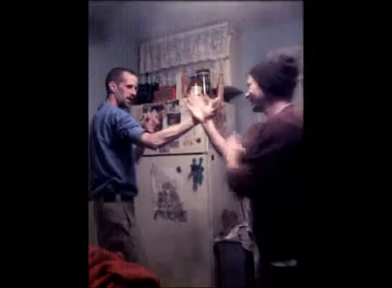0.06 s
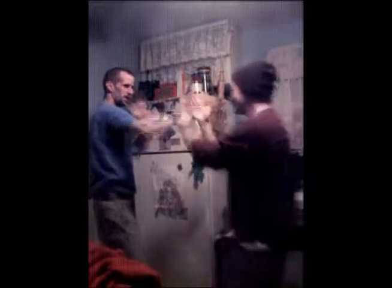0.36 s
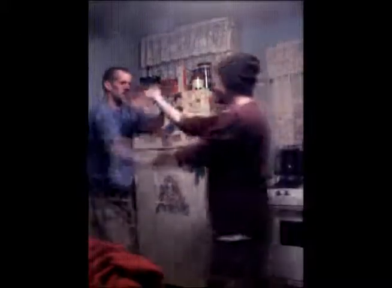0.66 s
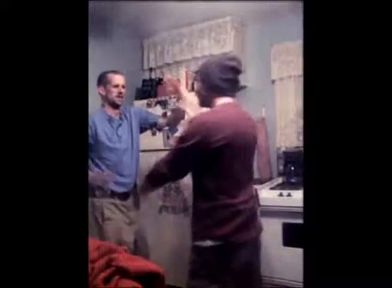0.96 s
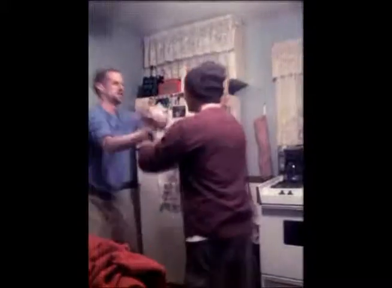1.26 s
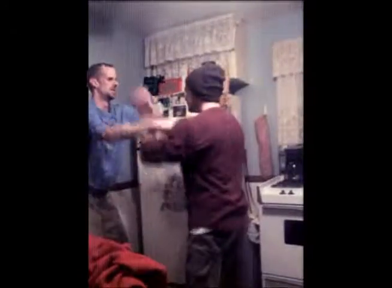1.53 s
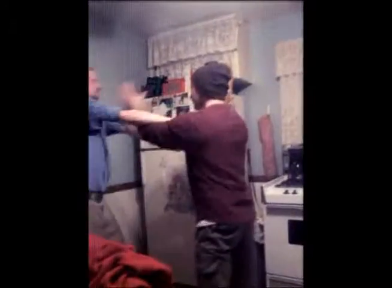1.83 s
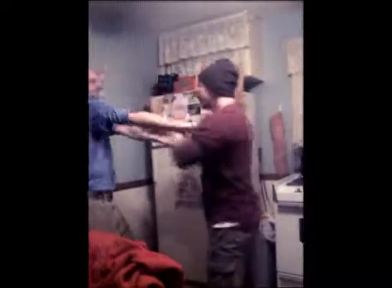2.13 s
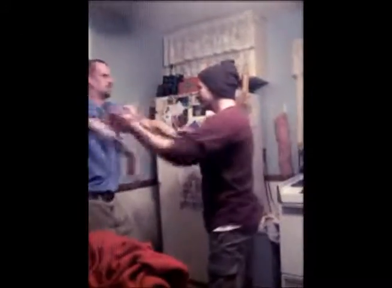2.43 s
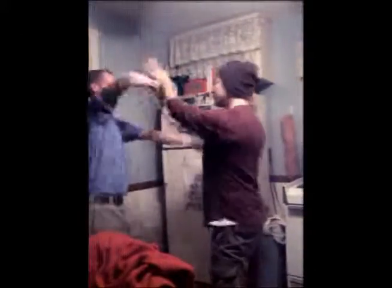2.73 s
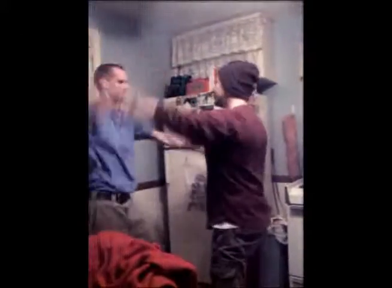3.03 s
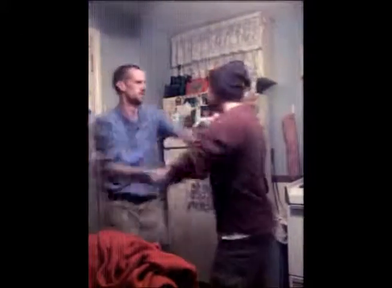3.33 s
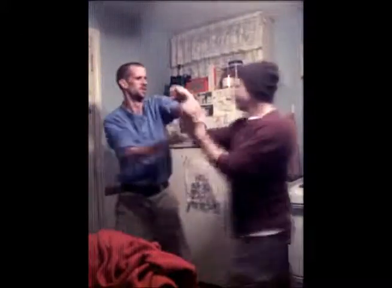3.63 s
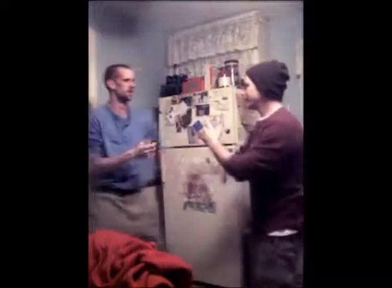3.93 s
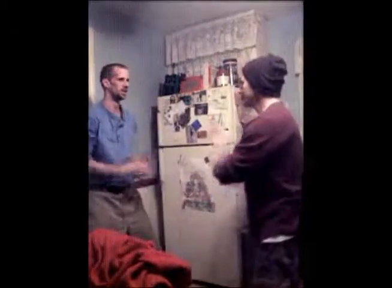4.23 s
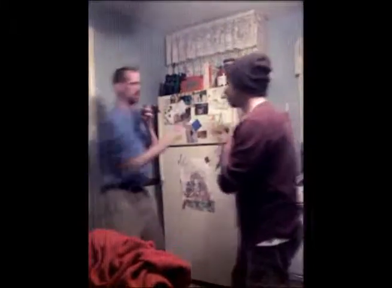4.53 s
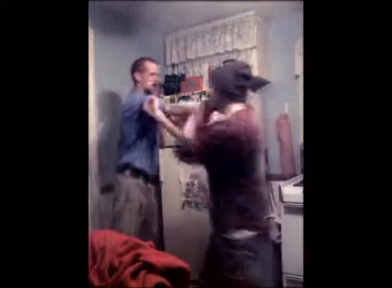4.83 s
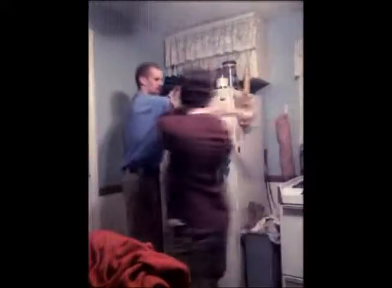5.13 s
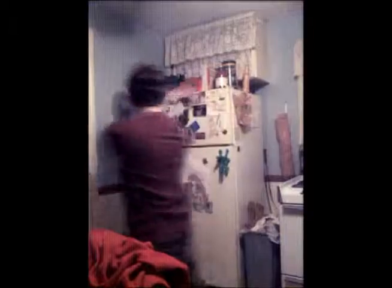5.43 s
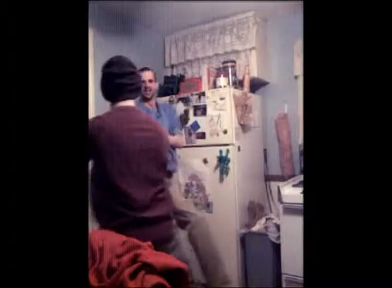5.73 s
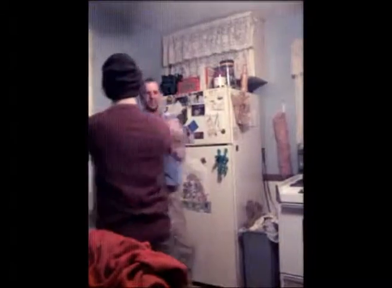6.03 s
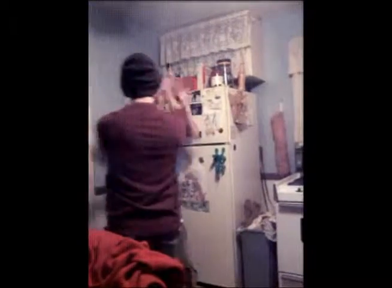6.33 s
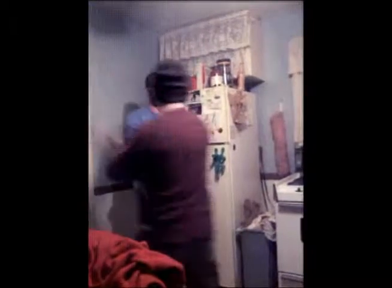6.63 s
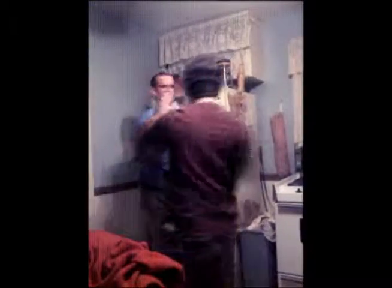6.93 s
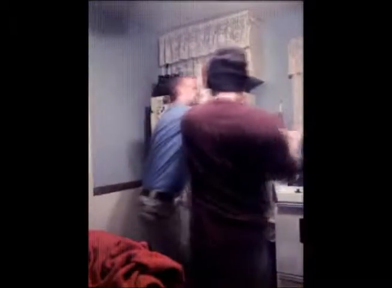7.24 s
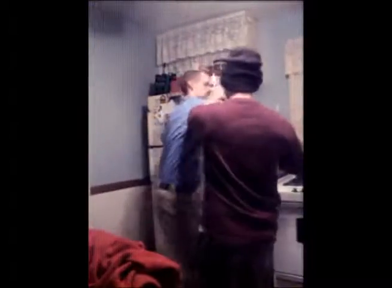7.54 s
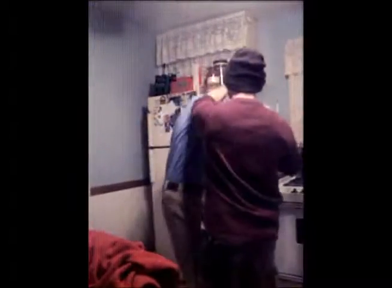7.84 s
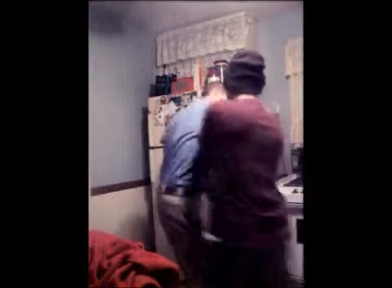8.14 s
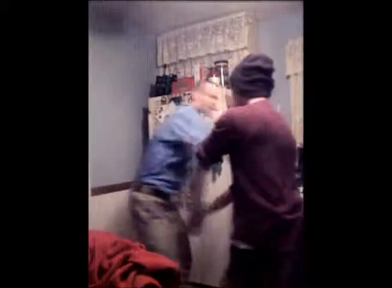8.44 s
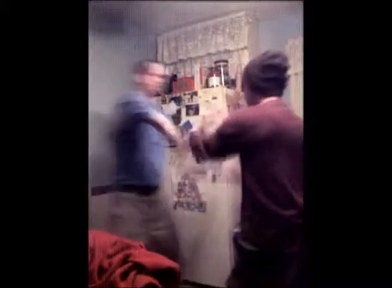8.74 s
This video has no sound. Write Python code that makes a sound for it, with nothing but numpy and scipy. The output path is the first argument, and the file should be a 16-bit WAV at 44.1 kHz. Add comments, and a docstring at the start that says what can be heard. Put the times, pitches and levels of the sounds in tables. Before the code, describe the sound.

Irregular swishes of cloth and sharp slaps on skin from two people sparring, over soft thumps on a wooden floor and a refrigerator hum.

```python
"""Sleeves swish and drag over each other as two people spar hand to hand in a small kitchen: a hiss of
slipping fibres, ticking where threads catch. Hands crack on forearms, a few with the pop of a cupped
palm, and these hits ring briefly in the room. Feet thump on a wooden floor that booms and rumbles
under the shifting weight. A refrigerator hums behind it all, and one small microphone hears the scene."""
import sys
import numpy as np
from scipy import signal
from scipy.fft import rfft, irfft, next_fast_len
from scipy.io import wavfile
from scipy.ndimage import uniform_filter1d, map_coordinates

SR = 44100
rng = np.random.default_rng(int(sys.argv[2]) if len(sys.argv) > 2 else 0)


def bounce(signal):
    """Save signal as a 16-bit WAV file at the path given by the first command-line argument."""
    frames = np.transpose(np.atleast_2d(signal))
    limited = np.clip(frames, -1, 1)
    pcm = np.round(limited * 32767).astype(np.int16)
    wavfile.write(sys.argv[1], SR, pcm)


N = 395577


def sleeves():
    """Sleeve slides over sleeve: speed brightens the hiss, firm pressure brings out the cloth's body."""
    # strokes: (start [s], rise [s], hold [s], hiss [dB], body re hiss [dB], brightness [dB])
    swishes = [(0, 0.0034, 0.0023, -32.5, -1.5, -2.5), (.062, .044, .004, -26.5, -8, 0),
               (0.188, 0.0079, 0.018, -32, -6, -3), (0.409, .015, .015, -27, -8.5, -2.5),
               (.548, .032, .014, -19.3, -6, -.3), (0.725, .055, .013, -32, -7.5, 3),
               (.865, 0.081, 0.053, -23.5, -12, -0.8), (1.109, 0.053, 0.018, -19, -11.5, 3),
               (1.199, 0.034, .036, -18.5, -14.5, -0.7), (1.384, 0.12, 0.062, -20, -8.5, -1.5),
               (1.575, .027, .017, -27, -6.5, 1.5), (1.964, 0.092, 0.098, -33, -18, 1),
               (2.2, .04, .05, -34.5, -2.5, 0), (2.616, .054, .027, -33.5, -5, 0.5),
               (3.123, .006, .002, -36, -19, 4), (3.195, .072, .078, -34.5, -6, -1),
               (3.341, 0.067, 0.12, -17.5, -12.5, 0.5), (3.572, 0.027, 0.19, -30.5, -10, -1),
               (3.87, 0.029, 0.074, -19, -6.5, 0), (4.287, .018, .045, -31, -12.5, -1.5),
               (4.528, 0.067, 0.064, -19.5, -10.5, 1.5), (4.687, .012, 0.032, -27, 0, 0),
               (4.761, .13, .002, -17, -10, 0.6), (5.035, .035, 0.025, -29.5, -11, -.5),
               (5.17, .012, .03, -30, 2, -1), (5.256, .044, .008, -15.5, -12, -1),
               (5.313, 0.045, 0.032, -19, -8.5, -.7), (5.418, .06, 0.088, -33.5, -5, -2),
               (5.738, .008, .016, -37.5, -4, -4), (5.914, .014, .006, -34, 0, 0.5),
               (6.085, .021, .003, -38.5, -9, 6), (6.218, 0.23, 0.063, -25, -14.5, -2.5),
               (6.672, 0.095, .039, -17.5, -8.5, -0.5), (6.857, .028, 0.033, -17.5, -13, 0),
               (6.92, .032, .008, -15.5, -19.5, -2.5), (6.998, .016, 0.17, -32, -5, -2.5),
               (7.346, .004, 0.0033, -20, -21, -.5), (7.4, .023, .031, -30.5, -5, -1),
               (7.505, .034, .063, -32, -9.5, -2.5), (7.804, 0.061, .089, -27.5, -8, -2.5),
               (7.952, 0.059, .002, -18, -9.5, -0.8), (8.094, .036, .008, -17.5, -17, 3),
               (8.16, 0.031, 0.084, -21.5, -12, .5), (8.395, .053, .088, -34, -7.5, -2),
               (8.631, .036, .058, -39, -2, -.8)]
    # clothes stirring between strokes: (time [s], hiss [dB])
    stirring = [(0, -48), (.3, -39), (1.35, -36.5), (1.72, -36), (1.9, -46), (2.4, -38.5), (2.95, -46.5),
                (3.65, -37), (3.86, -39.5), (4.15, -37.5), (4.5, -42.5), (5.6, -37), (6, -40.5),
                (7.25, -36.5), (7.75, -43), (8.4, -41), (8.97, -42)]
    # bright hiss of the weave: (frequency [Hz], level [dB])
    weave_spectrum = [(300, -38), (1200, -22), (2200, -8), (3200, -2), (4200, 0.8), (5200, 2), (6200, -2),
                      (7000, -8), (7800, -19)]
    # lower body of the cloth: (frequency [Hz], level [dB])
    body_spectrum = [(80, -13), (250, -2.5), (650, -1.5), (1200, 0.5), (2000, 2), (3200, -0.5), (5000, -7),
                     (7800, -49.5)]
    rustle = amp(np.interp(np.arange(N) / SR, *np.transpose(stirring)))
    coarse_power, fine_power = rustle ** 2, rustle ** 2
    body_power = (rustle * amp(-1.5)) ** 2
    for start, rise, hold, db, body_db, bright_db in swishes:
        power = (amp(db) * stroke(start, rise, hold)) ** 2
        coarse_power += power * amp(-bright_db) ** 2
        fine_power += power * amp(bright_db) ** 2
        body_power += power * amp(body_db) ** 2
    weave = friction(weave_spectrum, catches_per_s=1500, catch_share=0.13, flutter_db=0.52)
    weave = patchy(weave, depth_db=1.75)
    coarse = filtered(weave, lambda hz: 1 / (1 + (hz / 4200) ** 10))  # brightness tilts about 4200 Hz
    fine = weave - coarse
    body = friction(body_spectrum, catches_per_s=900, catch_share=0.18, flutter_db=1.4)
    grip = amp(0.4 * wobble(35))  # tightens and loosens within a stroke
    hiss = np.sqrt(coarse_power) * coarse + np.sqrt(fine_power) * fine
    return grip * (hiss + np.sqrt(body_power) * body)


def stroke(start, rise, hold, sag_db_per_s=17, release_db_per_s=190):
    """Envelope of one swish, 1 at mid-hold: the sleeve gathers speed, slows a little and comes to rest."""
    t = np.arange(N) / SR - start
    swell = np.clip(t / rise, 0, 1) ** 1.1
    sag_db = sag_db_per_s * (np.clip(t - rise, 0, hold) - hold / 2)
    release_db = release_db_per_s * np.clip(t - rise - hold, 0, 1)
    return swell * amp(-sag_db - release_db)


def friction(spectrum, catches_per_s, catch_share, flutter_db):
    """Countless fibres slip as a hiss; threads catch and snap free as tiny ticks."""
    sizes = rng.uniform(-1, 1, N)
    catches = (rng.random(N) < catches_per_s / SR) * sizes
    slips = np.sqrt(1 - catch_share) * rng.standard_normal(N)
    ticks = np.sqrt(catch_share) * unit(catches)
    folds = amp(flutter_db * wobble(90))  # passing folds change the pressure
    return unit(colour((slips + ticks) * folds, spectrum))


def patchy(hiss, depth_db):
    """The hiss shifts a little in colour from moment to moment."""
    bands = signal.stft(hiss, nperseg=512)[2]
    patches = uniform_filter1d(rng.standard_normal(bands.shape), size=5, axis=0)  # smooth over frequency
    patches = uniform_filter1d(patches, size=12, axis=1)  # and over time
    return signal.istft(bands * amp(depth_db * unit(patches)), nperseg=512)[1][:N]


def slaps():
    """A hand cracks on skin in one sharp pulse, thuds into the flesh and skids on over the sleeve."""
    # hands landing on arms: (time [s], crack [dB], thud re crack [dB], skid re crack [dB])
    hits = [(0.0653, -12, -12.5, -23), (0.185, -9.5, -22.5, -26.5), (0.4141, -5.5, -21, -15.5),
            (0.4202, 7.5, -42.5, -25), (0.5496, 6, -27.5, -32), (1.149, 0.5, -28, -37),
            (1.2298, 1.5, -36.5, -29), (3.134, -9.5, -49, -27), (3.8815, -9.5, -14.5, -29.5),
            (4.541, -1, -18.5, -17.5), (4.6252, 11, -39.5, -31), (4.707, 2.5, -29, -27),
            (5.1767, -8, -17.5, -23), (5.7362, -6.5, -26, -20.5), (6.6223, -9.5, -41, -22),
            (7.347, -1, -28.5, -20), (7.3595, 0, -32, -35), (8.1021, -0.5, -23.5, -28.5)]
    # bright smack of skin: (frequency [Hz], level [dB])
    skin_spectrum = [(200, -37), (800, -10), (2000, 5), (3500, 8), (5500, 7.5), (7000, 1), (7900, -33)]
    # dull thud of flesh: (frequency [Hz], level [dB])
    flesh_spectrum = [(100, -5), (300, -3), (650, 0), (1200, -0.5), (2200, -14), (6000, -39.5)]
    crack, thud, skid = np.zeros((3, N))
    for s, db, thud_db, skid_db in hits:
        pulse = amp([db])
        add(crack, s, pulse)
        add(crack, s + rng.uniform(0.0019, 0.0049), 0.54 * pulse)  # echo from the nearest surface
        add(thud, s, amp(db + thud_db) * burst(rise=0.00079, t60=0.17))
        add(skid, s, amp(db + skid_db) * burst(rise=0.00047, t60=0.16))
    return room(colour(crack + skid, skin_spectrum) + colour(thud, flesh_spectrum), wet_db=-10)


def palms():
    """Air squeezed from under a cupped palm pops, higher and shorter when the hollow is small."""
    # ringing hollows: (time [s], level [dB], pitch [Hz], t60 [s])
    hollows = [(.4204, 6.5, 2340, 0.0032), (.551, -11, 727, 0.049), (3.8795, -13, 619, .04),
               (4.542, -19, 783, .045), (8.101, -25, 620, 0.037)]
    pops, t = np.zeros(N), np.arange(SR // 10) / SR
    for s, db, hz, t60 in hollows:
        envelope = amp(db - 60 * t / t60) * (1 - np.exp(-t * hz))
        add(pops, s, envelope * np.sin(2 * np.pi * hz * t))
    return room(pops, wet_db=-6)


def steps():
    """Heel and sole thump down and the boards boom under them."""
    # footfalls: (time [s], sole [dB], boom re sole [dB], heel re sole [dB], thump re sole [dB])
    footfalls = [(0.067, -31.5, -12, 6, 8), (1.123, -25, 5.5, -9, 2), (3.885, -36, 7, -7, 10),
                 (4.321, -25.5, 5, 3.5, 1.5), (4.355, -31.5, 10, 7, 2), (4.544, -37, -6, -3, 8),
                 (5.181, -29, -2, 4.5, 3), (5.342, -40, 13, 8, -2), (5.921, -26.5, 2.5, -1.5, 6.5),
                 (5.938, -26.5, 3, -2, 8.5), (7.07, -29.5, -1, -1.5, 3.5), (7.395, -32.5, 7, -9, 3),
                 (7.468, -27.5, 9, 6.5, 5), (7.495, -29.5, 5, 3.5, -1)]
    # modes of the wooden floor: (frequency [Hz], level [dB], t60 [s])
    floor_modes = [(70.7, -2, 0.2), (105.8, 4.5, 0.08), (143.4, -7.5, 0.35), (195, -9, 0.21)]
    # soft pad of the sole: (frequency [Hz], level [dB])
    sole_spectrum = [(80, -35.5), (190, 0.5), (250, -3.5), (310, -7), (400, -12), (800, -33), (2500, -48.5)]
    # knock of the heel: (frequency [Hz], level [dB])
    heel_spectrum = [(100, -17), (270, -1.5), (330, 1), (380, 2), (450, -9.5), (560, -11.5), (800, -21.5),
                     (2500, -41.5)]
    soles, heels, boards = np.zeros((3, N))
    for s, db, boom_db, heel_db, thump_db in footfalls:
        add(soles, s, amp(db) * burst(rise=0.014, t60=0.34))
        add(heels, s, amp(db + heel_db) * burst(rise=0.0038, t60=0.26))
        boom = sum(amp(level + rng.normal(0, 4.6)) * ring(hz, t60) for hz, level, t60 in floor_modes)
        thump = ring(hz=243, t60=0.19)  # the main resonance under a footfall
        add(boards, s, amp(db + boom_db) * boom + amp(db + thump_db) * thump)
    return colour(soles, sole_spectrum) + colour(heels, heel_spectrum) + boards


def ring(hz, t60, rise=0.0027):
    """One mode of the struck floor speaks quickly and rings down."""
    t = np.arange(SR // 2) / SR
    envelope = (1 - np.exp(-t / rise)) * amp(-60 * t / t60)
    return envelope * np.sin(2 * np.pi * (hz * t + rng.random()))


def floor_flex(half_width_s=0.088, rest_db=-46.5):
    """The floor rumbles very low, swelling as it flexes under each shift of weight."""
    # weight moving onto a foot: (time [s], rumble [dB])
    shifts = [(1.29, -37), (1.68, -33.5), (3.35, -37), (4.72, -32.5), (4.92, -38), (5.35, -27),
              (5.96, -34.5), (7.1, -38), (7.25, -32.5), (8.39, -35.5)]
    # sub-bass of the floor: (frequency [Hz], level [dB])
    rumble_spectrum = [(5, -19.5), (14, 0.5), (24, 9.5), (40, -2.5), (80, -11.5), (300, -50.5)]
    t = np.arange(N) / SR
    swells = sum(amp(db) * np.exp(-((t - s) / half_width_s) ** 2) for s, db in shifts)
    return (amp(rest_db) + swells) * noise(rumble_spectrum)


def refrigerator(swell_db=2.2, lull_at_s=3.3, cycle_s=12):
    """The compressor drones, its overtones wavering and slowly swelling over a soft rush of air."""
    # compressor tones: (frequency [Hz], rms level [dB])
    tones = [(59.2, -35.5), (118.4, -48), (242.2, -51.5), (290.7, -47), (414.5, -54), (479.1, -56.5),
             (635.2, -54), (759.0, -60.5), (909.8, -60.5)]
    # rush of air: (frequency [Hz], level [dB])
    air_spectrum = [(20, -13), (60, 4), (100, -5.5), (170, -2), (240, -0.5), (340, 4), (480, -7), (700, -5),
                    (1200, -11.5), (2500, -22.5), (5000, -12.5), (7800, -32.5)]
    t = np.arange(N) / SR
    drift_db = -swell_db * np.cos(2 * np.pi * (t - lull_at_s) / cycle_s)
    hum = np.zeros(N)
    for hz, db in tones:
        unrest = min(hz / 700, 1)  # higher tones are less steady
        level_db = db + 3 * unrest * wobble(4) + drift_db * (hz > 200)  # the lowest skip the slow swell
        phase = 2 * np.pi * (hz * t + rng.random()) + 1.3 * unrest * wobble(3)
        hum += np.sqrt(2) * amp(level_db) * np.sin(phase)
    return hum + amp(-37.5) * noise(air_spectrum)


def room(x, wet_db):
    """Direct sound plus the kitchen's short tail, at the same total power."""
    # decay of the kitchen: (frequency [Hz], t60 [s])
    decay_times = [(100, 0.33), (500, 0.2), (3000, 0.34), (8000, 0.12)]
    hz, t, bands = signal.stft(rng.standard_normal(SR // 2), SR, nperseg=256)
    decay = amp(-60 * t / along(decay_times, hz)[:, None])
    tail = signal.istft(bands * decay, SR, nperseg=256)[1]
    tail = np.pad(tail / np.linalg.norm(tail), (SR // 300, 0))  # 3.3 ms of pre-delay
    return (x + amp(wet_db) * signal.fftconvolve(x, tail)[:N]) / np.hypot(1, amp(wet_db))


def amp(db):
    """Decibels to gain."""
    return 10 ** (np.asarray(db) / 20)


def unit(x):
    """Scale to rms 1."""
    return x / np.sqrt(np.mean(x ** 2) + 1e-20)


def along(points, hz):
    """Read (frequency [Hz], value) points on a log frequency axis."""
    frequencies, values = np.transpose(points)
    return np.interp(np.log(hz + 1), np.log(frequencies + 1), values)


def wobble(rate):
    """A smooth random curve with rate knots a second."""
    knots = rng.standard_normal(int(N * rate / SR) + 4)
    return map_coordinates(knots, [np.arange(N) * rate / SR])


def colour(x, spectrum):
    """Minimum-phase EQ of unit energy: the spectrum sets the tone, and nothing rings ahead of a hit."""
    size = 2 * next_fast_len(N // 2 + SR // 4)
    gain = unit(amp(along(spectrum, np.fft.rfftfreq(size, 1 / SR))))
    cepstrum = irfft(np.log(gain))
    cepstrum[1:size // 2] *= 2
    cepstrum[size // 2 + 1:] = 0
    return irfft(rfft(x, size) * np.exp(rfft(cepstrum)))[:N]


def filtered(x, response):
    """Zero-phase EQ with gain response(hz)."""
    size = next_fast_len(N + SR // 2)
    return irfft(rfft(x, size) * response(np.fft.rfftfreq(size, 1 / SR)), size)[..., :N]


def noise(spectrum):
    """Coloured noise of rms 1."""
    return unit(colour(rng.standard_normal(N), spectrum))


def burst(rise, t60):
    """A puff of noise that swells and dies away; times in seconds."""
    t = np.arange(SR // 2) / SR
    return rng.standard_normal(len(t)) * (1 - np.exp(-t / rise)) * amp(-60 * t / t60)


def add(track, s, sound):
    """Mix a sound into a track at s seconds."""
    part = track[max(round(s * SR), 0):][:len(sound)]
    part += sound[:len(part)]


def scene():
    """One microphone feeds both channels, the right a little louder."""
    mix = sleeves() + slaps() + palms() + steps() + floor_flex() + refrigerator()
    return mix * amp([[-1.6], [1.35]])


def record(dry):
    """Peaks clip at full scale, then the treble is cut off above a speech band."""
    return filtered(np.clip(dry, -1, 1), lambda hz: hz < 7950)


dry = scene()
out = record(dry)
bounce(out)
```